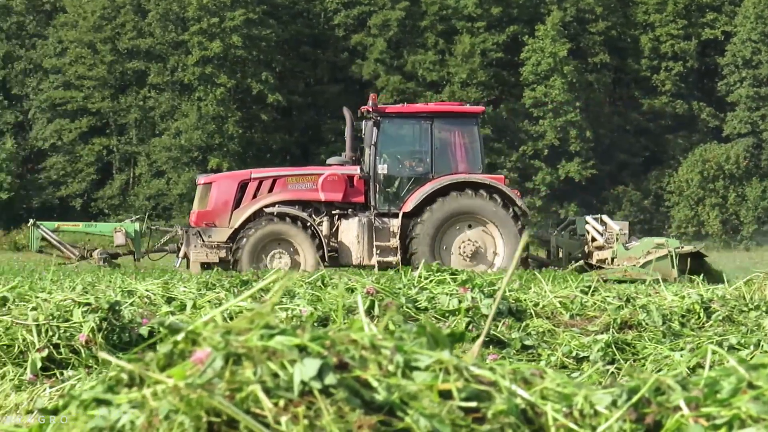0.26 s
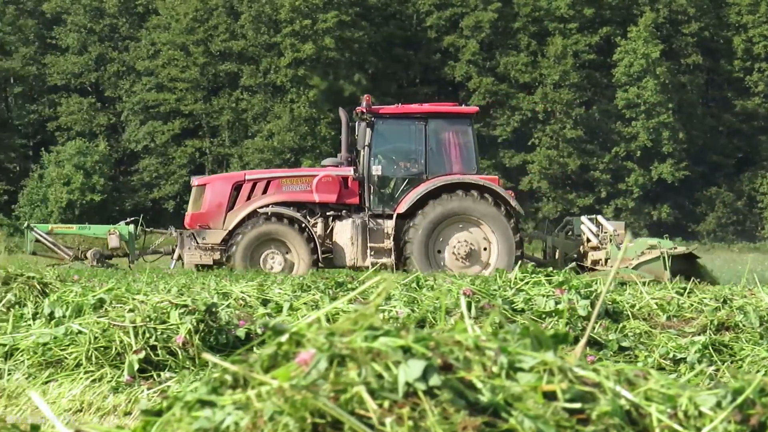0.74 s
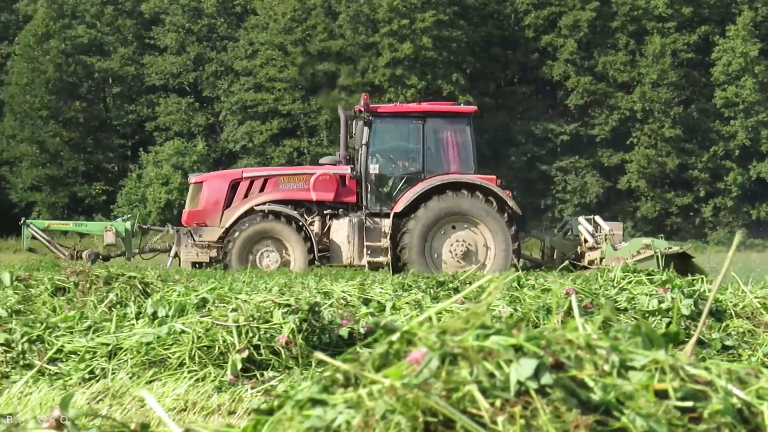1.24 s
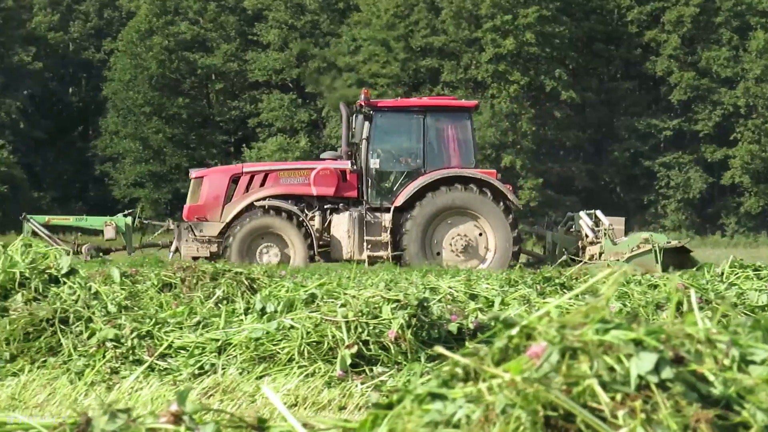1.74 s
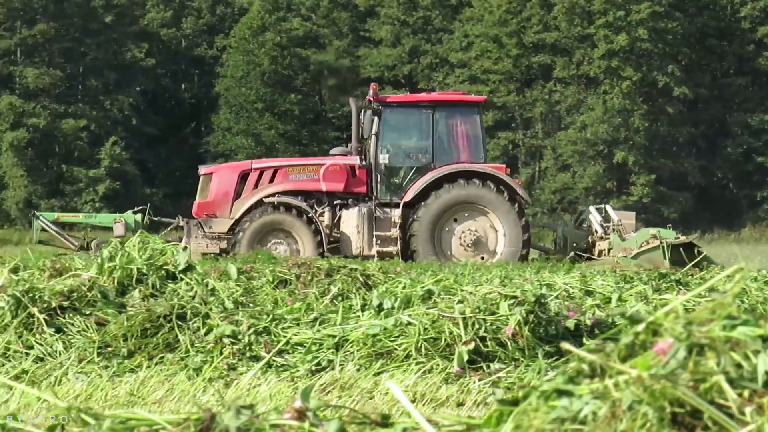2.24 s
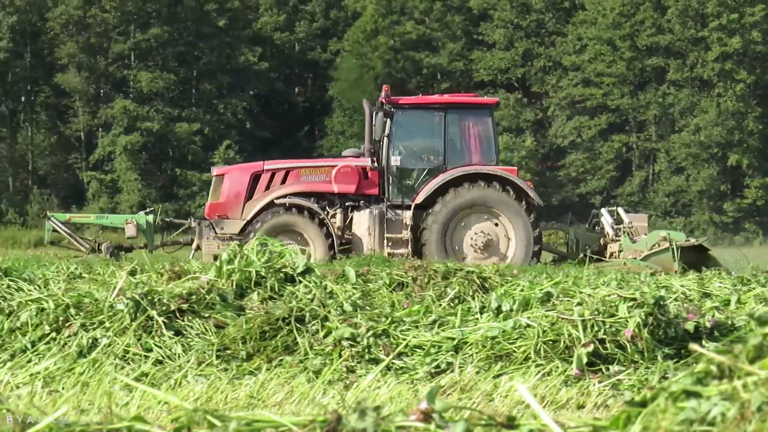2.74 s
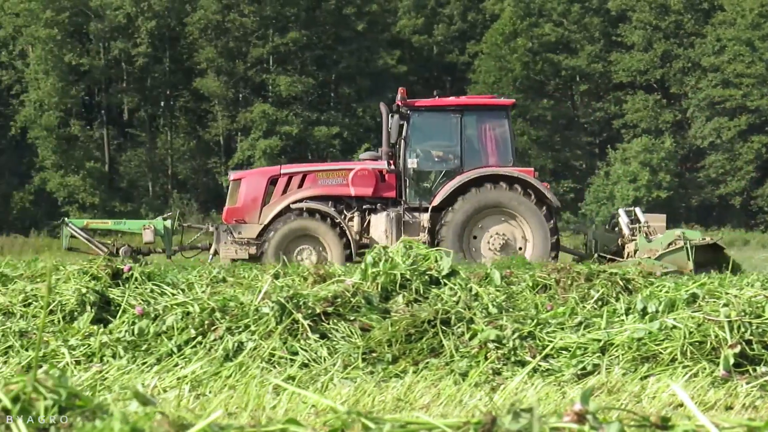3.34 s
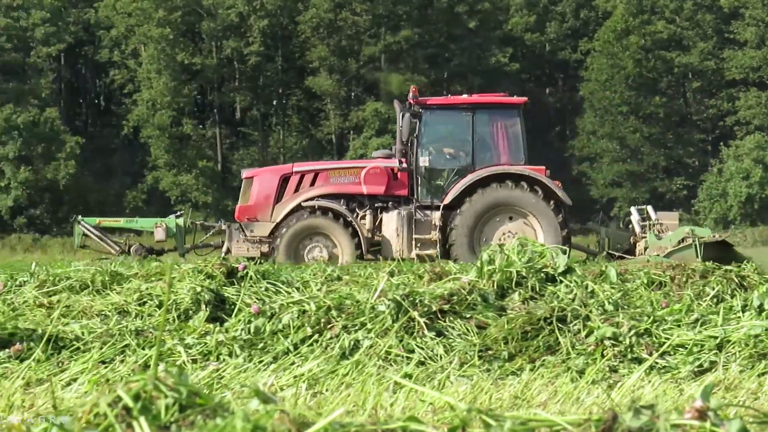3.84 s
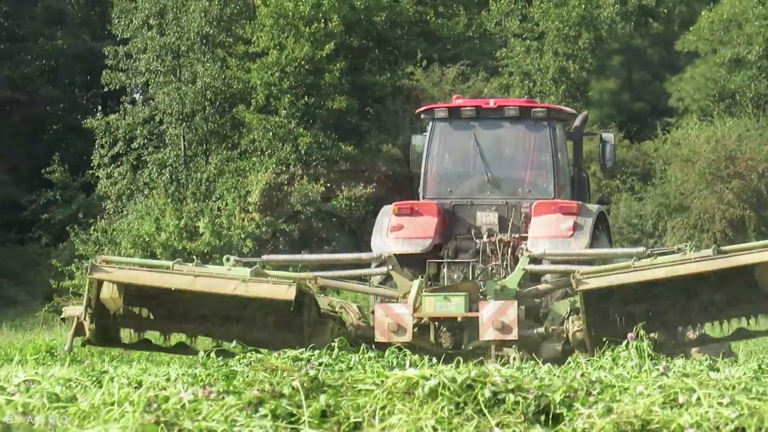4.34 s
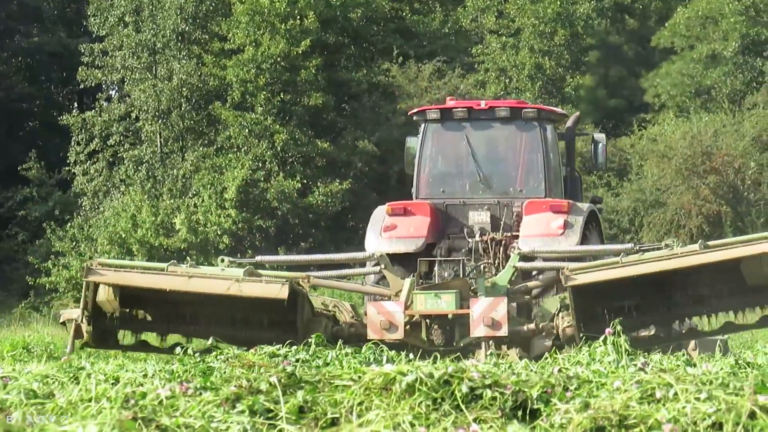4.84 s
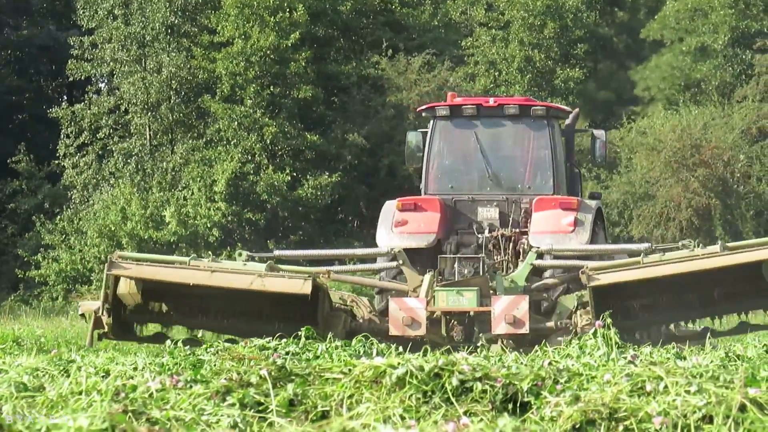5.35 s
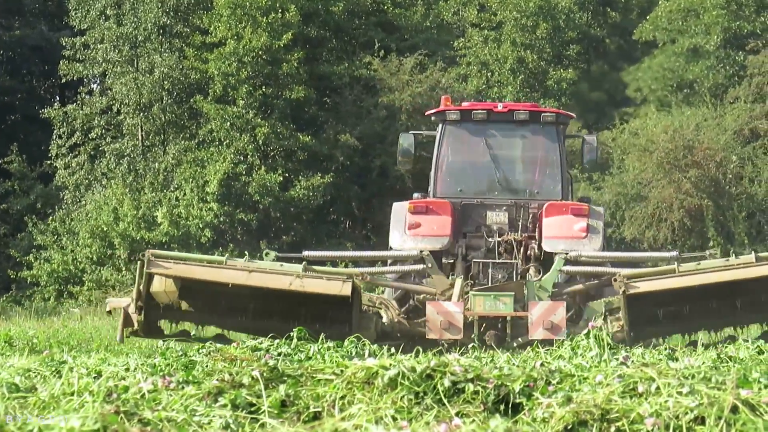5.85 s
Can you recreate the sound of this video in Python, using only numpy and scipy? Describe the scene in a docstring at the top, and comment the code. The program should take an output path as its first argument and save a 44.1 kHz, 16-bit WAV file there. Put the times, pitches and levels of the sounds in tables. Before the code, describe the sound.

Outdoors in a meadow, a heavy six-cylinder diesel tractor with front and rear disc mowers works at high, nearly constant revs from 0 to 4.3 seconds. A strong low firing drone near 97 Hz beats quickly with the rear mower hum and slowly with the front one. Beneath are exhaust rumble, dull diesel knock, rattling metal and soft grass swish. Gear whine swells around 1.5, 2.9 and 4 seconds; a very faint, thin turbo whistle fades by 0.9 and returns near 3.7-4.2. Revs sag slightly from 3.2, and swish thickens near 3.9. At 4.28 a hard cut with a tiny click drops the firing note to about 74 Hz. From behind, a rear mower hum near 155 Hz leads, knives chop the hiss, and knock and swish slowly recede until the abrupt end at about 6.1. Sound is central, almost mono, with little high treble.

```python
"""A six-cylinder tractor drives disc mowers across a meadow, heard first from the side, then,
after a hard cut, from behind at lower revs. One crank speed per view drives exhaust tones, the hum of
front and rear mowers beating against the firing tone, and diesel knock; from the side also gear whine.
Under them lie shaped noises: exhaust rumble, rattling machinery and the swish of knives in the grass.
Two thin turbocharger whistles, gliding sines, sound in the side view."""
import sys
import numpy as np
from scipy import signal
from scipy.fft import rfft, irfft
from scipy.io import wavfile

SR = 44100
rng = np.random.default_rng(int(sys.argv[2]) if len(sys.argv) > 2 else 0)


def dump(signal):
    """Clip the signal to [-1, 1] and save it as 16-bit WAV at the path in sys.argv[1]."""
    limited = np.clip(np.atleast_2d(signal).T, -1, 1)
    pcm = np.round(limited * 32767).astype(np.int16)
    wavfile.write(sys.argv[1], SR, pcm)


N = 268569
TIME, FREQS = np.arange(N) / SR, np.fft.rfftfreq(N, 1 / SR)


def amp(db):
    """Decibels to gain."""
    return 10 ** (np.asarray(db) / 20)


def unit(x):
    """Scales to rms 1."""
    return x / np.sqrt(np.mean(x ** 2) + 1e-20)


def follow(rows):
    """One curve over time for each column after start_s, linear between rows."""
    start_s, *columns = np.transpose(rows)
    return [np.interp(TIME, start_s, column) for column in columns]


def spectrum(points):
    """Gain at every frequency from (freq_hz, level_db) points, on a log frequency axis."""
    freq_hz, level_db = np.transpose(points)
    return amp(np.interp(np.log(FREQS + 1), np.log(freq_hz + 1), level_db))


def shaped(x, gain):
    """Filters x by a gain for every frequency."""
    return irfft(rfft(x) * gain, N)


def wander(rate_hz):
    """Slow random drift of rms 1: noise under a Gaussian low-pass."""
    lowpass = np.exp(-.5 * (FREQS / rate_hz) ** 2)
    return unit(shaped(rng.standard_normal(N), lowpass))


def tone(turns, level_db):
    """A sine of the given rms level, one period per turn."""
    return np.sqrt(2) * amp(level_db) * np.cos(2 * np.pi * turns)


REAR_MOWER_RATIO, FRONT_MOWER_RATIO = 1.584, 1.479  # disc turns per crank turn


def shaft_turns(speed, throb_s):
    """Turns of the crank and of the rear and front mower discs, which are geared to it."""
    turns = np.cumsum(follow(speed)[0]) / SR
    rear_at, front_at = np.interp(throb_s, TIME, turns)
    rear = REAR_MOWER_RATIO * (turns - rear_at)
    # 3 firings against 2 knives: the offset puts the front hum in phase with the firing tone at front_at
    front = FRONT_MOWER_RATIO * (turns - front_at) + 3 / 2 * (front_at - rear_at)
    return turns - rear_at, rear, front


def drone(turns, levels_db, waver_db):
    """The firing tone and its octave: six cylinders fire three times a crank turn."""
    firings = 3 * turns
    return sum(tone(k * firings, db + waver_db * wander(3.7)) for k, db in enumerate(levels_db, start=1))


def shaft_tones(turns, orders, waver_db, jitter_turns, any_angle):
    """Tones locked to a shaft; uneven load makes each waver in level and shakes the shaft a little."""
    turns = turns + jitter_turns * wander(4.1)
    total = 0
    for order, level_db in orders:
        angle = any_angle * rng.random()
        total = total + tone(order * turns + angle, level_db + waver_db * wander(6.0))
    return total


# strength of each cylinder's knock, in firing order: level_db
CYLINDERS_DB = [-3, -23, -12.5, -6, -13.5, -14.5]


def knock_pulses(turns, depth, decay):
    """Each firing is a burst decaying over its share of the cycle; decay is in firing intervals."""
    firings = 3 * turns
    cylinder = np.floor(firings).astype(int) % len(CYLINDERS_DB)
    strength = amp(CYLINDERS_DB)[cylinder]
    return 1 + depth * strength * np.exp(-(firings % 1) / decay)


def cycle_noise(turns, repeat):
    """Noise of which a power share, repeat, recurs with every engine cycle of two turns."""
    samples_per_cycle = int(2 * N / (turns[-1] - turns[0]))
    cycle = rng.standard_normal(samples_per_cycle)
    position = (turns / 2 % 1 * samples_per_cycle).astype(int) % samples_per_cycle
    repeat = np.clip(repeat, 0, 1)
    return np.sqrt(repeat) * cycle[position] + np.sqrt(1 - repeat) * rng.standard_normal(N)


# slow chance swell on bumpy ground: rumble_db, knock_db, rattle_db, swish_db (rms)
UNEVEN_DB = (1.0, 0.82, 0.54, 0.33)
UNEVEN_HZ = 4.4


def machine_noise(turns, levels_db, colour, notches, knock, rattle, swish, repeat, flutter_db):
    """Exhaust rumble, diesel knock, rattling metal and knives in grass, each in its own register."""
    notch_db = sum(db * np.exp(-.5 * ((FREQS - hz) / width) ** 2) for hz, width, db in notches)
    gain = spectrum(colour) * amp(notch_db)

    disc_turns = REAR_MOWER_RATIO * turns
    knives = np.cos(2 * np.pi * disc_turns) + np.cos(4 * np.pi * disc_turns)
    drives = [
        rng.standard_normal(N),
        cycle_noise(turns, repeat) * knock_pulses(turns, knock, decay=0.6),
        cycle_noise(turns, repeat / 2) * knock_pulses(turns, rattle, decay=0.29) * amp(flutter_db * wander(25)),
        rng.standard_normal(N) * (1 + swish * knives) * amp(flutter_db * wander(25))]

    # power crossovers between the four registers
    below = [1 / (1 + (FREQS / hz) ** 24) for hz in (480, 1400, 3100)]
    edges = [0 * FREQS, *below, np.ones(len(FREQS))]
    registers = np.sqrt(np.abs(np.diff(edges, axis=0)))

    total = 0
    for drive, register, level_db, uneven_db in zip(drives, registers, levels_db, UNEVEN_DB):
        layer = unit(shaped(drive, gain * register))
        total = total + amp(level_db + uneven_db * wander(UNEVEN_HZ)) * layer
    return total


# whine at twice the tooth rate: start_s, level_db
WHINE = [(0, -51), (.65, -55), (1.1, -44.5), (1.55, -39), (2.0, -50), (2.9, -38.5), (3.25, -51),
         (3.55, -43.5), (3.97, -40), (4.28, -58)]
# whine at three times the tooth rate: start_s, level_db
WHINE_OVERTONE = [(0, -44.5), (.75, -58), (2.2, -44.5), (3.1, -49.5), (4.28, -55)]
GEAR_TEETH, WHINE_WAVER_DB = 29, 1.8


def gear_whine(turns):
    """Overtones of a meshing crank gear, slightly blurred by play between the teeth."""
    mesh = GEAR_TEETH * turns + .012 * wander(14)
    levels_db = follow(WHINE) + follow(WHINE_OVERTONE)
    return sum(tone(k * mesh, db + WHINE_WAVER_DB * wander(2.5)) for k, db in enumerate(levels_db, start=2))


def turbo(start_s, length_s, pitch_hz, glide_hz_per_s, peak_db):
    """A thin turbocharger whistle of unsteady pitch that swells and fades over a half sine."""
    since_s = TIME - start_s
    pitch = pitch_hz + glide_hz_per_s * since_s + 7 * wander(30)
    swell = np.sin(np.pi * np.clip(since_s / length_s, 0, 1))
    return swell * tone(np.cumsum(pitch) / SR, peak_db)


# crank speed, sagging under load: start_s, crank_turns_per_s
SIDE_SPEED = [(0, 32.17), (.65, 32.07), (1.4, 32.33), (2.2, 32.24), (3.15, 32.11), (3.8, 31.48),
              (4.28, 31.3)]
# weaker exhaust tones, halves from unequal cylinders: crank_order, level_db
SIDE_EXHAUST = [(2, -55), (2.5, -42), (3.5, -33.5), (4, -29), (4.5, -38), (5, -32.5), (5.5, -48),
                (7, -41.5), (9, -46), (12, -47), (21, -56), (25, -52.5), (28, -60.5), (31, -50)]
# rear mower hum, two knives a disc: disc_order, level_db
SIDE_DISCS = [(1, -33.5), (2, -26), (3, -28), (4, -38), (6, -41), (8, -58)]
# front mower hum: disc_order, level_db
SIDE_FRONT_DISCS = [(1, -53), (2, -30.5), (3, -40), (4, -29.5), (6, -52)]
# thickness of the grass at the knives: start_s, swish_db
SIDE_CROP = [(0, 3), (.85, -1.5), (1.85, 1.2), (2.3, -2.5), (2.8, 0.3), (3.7, 0.4), (3.92, 4.5),
             (4.12, 1.6)]
# share of the crop's swell: rumble, knock, rattle, swish (ratios)
CROP_SHARE = (.05, .15, .55, 1.0)
# noise colour, relative within each register: freq_hz, level_db
SIDE_COLOUR = [(20, -67.5), (40, -59.5), (70, -52), (130, -50), (200, -46), (280, -60), (360, -73),
               (700, -63), (1800, -59), (3000, -65), (5000, -79.5), (7000, -89), (9500, -101.6),
               (15500, -117.8)]
# direct sound cancelled by reflections from ground and bodywork, plus a narrow dip near 1.9 kHz: freq_hz,
# width_hz, gain_db
SIDE_NOTCHES = [(602, 103, -8), (1165, 59, -12), (1456, 123, -8.5), (1940, 31, -11.5), (2296, 94, -5.5),
                (3125, 103, -12), (3473, 117, -8.5), (3833, 103, -9.5), (4520, 65, -14.5), (5260, 76, -10),
                (6250, 76, -7), (6970, 80, -9.5), (7830, 120, -6), (8640, 200, -5)]
# turbocharger whistles: start_s, length_s, pitch_hz (at start), glide_hz_per_s, peak_db
TURBO = [(-.2, 1.1, 10630, 20, -73.5), (3.7, .5, 10080, -420, -72.5)]
SIDE_THROB_S = (2.01, 1.965)  # rear, front mower hum in phase with the firing tone
SIDE_DRONE_DB = (-21.5, -31)  # firing tone, octave
SIDE_NOISE_DB = (-22, -40.5, -36, -41.5)  # rumble, knock, rattle, swish before the crop's swell


def from_side():
    """High revs: the firing tone beats quickly against the rear mower and slowly against the front one."""
    turns, rear, front = shaft_turns(SIDE_SPEED, SIDE_THROB_S)
    firing = drone(turns, SIDE_DRONE_DB, waver_db=1.8)
    exhaust = shaft_tones(turns, SIDE_EXHAUST, waver_db=1.5, jitter_turns=0.0034, any_angle=True)
    rear_hum = shaft_tones(rear, SIDE_DISCS, waver_db=-0.5, jitter_turns=0.0057, any_angle=False)
    front_hum = shaft_tones(front, SIDE_FRONT_DISCS, waver_db=3.3, jitter_turns=0.0019, any_angle=False)
    crop_db = follow(SIDE_CROP)[0]
    levels_db = [db + share * crop_db for db, share in zip(SIDE_NOISE_DB, CROP_SHARE)]
    noise = machine_noise(turns, levels_db, SIDE_COLOUR, SIDE_NOTCHES,
                          knock=2.6, rattle=.15, swish=.015, repeat=0.18, flutter_db=0.68)
    whistles = sum(turbo(*row) for row in TURBO)
    return firing + exhaust + rear_hum + front_hum + noise + gear_whine(turns) + whistles


# crank speed: start_s, crank_turns_per_s
REAR_SPEED = [(4.28, 24.52), (4.85, 24.54), (5.2, 24.72), (5.7, 24.52), (6.09, 23.98)]
# weaker exhaust tones: crank_order, level_db
REAR_EXHAUST = [(1.5, -47.5), (4, -52.5), (4.5, -37.5), (5.5, -49.5), (9, -46), (12, -50)]
# rear mower hum: disc_order, level_db
REAR_DISCS = [(2, -35), (4, -19.5), (5, -40.5), (6, -40), (8, -39.5), (10, -47), (16, -58.5)]
# front mower hum: disc_order, level_db
REAR_FRONT_DISCS = [(2, -44), (4, -32)]
# fade while driving away: rumble, knock, rattle, swish (dB per s)
RECEDE_DB_PER_S = (0.24, 1.1, .5, 1.25)
# rise with the revs: rumble, knock, rattle, swish (dB per crank turn a second)
REVS_DB = (2.9, 2.5, 5.4, 1.1)
# noise colour, relative within each register: freq_hz, level_db
REAR_COLOUR = [(20, -90.5), (40, -52), (70, -58), (130, -45.5), (200, -49.5), (280, -52), (360, -64.5),
               (700, -69), (1800, -66.5), (3000, -69.5), (5000, -77.5), (7000, -85.5), (9500, -100.9),
               (15500, -116.6)]
# reflections cancelling or reinforcing the direct sound: freq_hz, width_hz, gain_db
REAR_NOTCHES = [(571, 40.5, -13.5), (930, 110, -3.5), (1404, 130, -6.5), (1830, 170, -0.5), (2560, 300, -5),
                (3240, 63, 2), (3480, 60, -8), (4750, 88, -10), (5130, 65, 3.5), (5570, 150, -9.5),
                (6440, 90, -17.5), (7380, 190, -8.5), (8100, 97, -9)]
REAR_THROB_S = (5.01, 4.55)  # rear, front mower hum in phase with the firing tone
REAR_DRONE_DB = (-23, -34)  # firing tone, octave
REAR_NOISE_DB = (-24.5, -41.5, -38.5, -39.5)  # rumble, knock, rattle, swish at the cut
CUT_S = 4.2802


def from_behind():
    """Low revs, driving away: the rear mower's hum leads and the knives chop the hiss."""
    turns, rear, front = shaft_turns(REAR_SPEED, REAR_THROB_S)
    firing = drone(turns, REAR_DRONE_DB, waver_db=1.7)
    exhaust = shaft_tones(turns, REAR_EXHAUST, waver_db=-3.0, jitter_turns=0.0036, any_angle=True)
    rear_hum = shaft_tones(rear, REAR_DISCS, waver_db=.6, jitter_turns=.003, any_angle=False)
    front_hum = shaft_tones(front, REAR_FRONT_DISCS, waver_db=-0.3, jitter_turns=.003, any_angle=False)
    speed = follow(REAR_SPEED)[0]
    levels_db = [db - fade * (TIME - CUT_S) + revs_db * (speed - speed[0])
                 for db, fade, revs_db in zip(REAR_NOISE_DB, RECEDE_DB_PER_S, REVS_DB)]
    noise = machine_noise(turns, levels_db, REAR_COLOUR, REAR_NOTCHES,
                          knock=1.7, rattle=0.49, swish=0.13, repeat=0.17, flutter_db=.5)
    return firing + exhaust + rear_hum + front_hum + noise


def splice(first, second, click_db, click_s):
    """An abrupt edit from one view to the next, with a small decaying click at the joint."""
    since_s = TIME - CUT_S
    over = np.clip(since_s / click_s + .5, 0, 1)
    click = amp(click_db) * (since_s >= 0) * np.exp(-np.abs(since_s) / click_s)
    return (1 - over) * first + over * second - click


# sound scattered back from the sides: freq_hz, level_db (against the direct sound)
WIDTH = [(60, -38.5), (110, -31.5), (200, -25), (380, -12.5), (700, -14.5), (1290, -21.5), (2380, -21),
         (4400, -15), (8120, -7.5), (15000, -24)]


def scene():
    """The tractor straight ahead; faint scatter, added left and subtracted right, gives a little width."""
    direct = splice(from_side(), from_behind(), click_db=-11.0, click_s=0.0013)
    echo_samples = SR // 12
    echoes = rng.standard_normal(echo_samples) * np.linspace(1, 0, echo_samples)
    echo_phase = np.exp(1j * np.angle(rfft(echoes, N)))  # only the phase of the echoes is used
    side = shaped(direct, spectrum(WIDTH) * echo_phase)
    return np.array([direct + side, direct - side]) * amp([[-.1], [.1]])


EDGE_HZ = 15600


def record(dry):
    """Limits the band with a linear-phase low-pass, after 3 ms fades at both ends."""
    ends = np.clip(np.minimum(TIME, TIME[-1] - TIME) / .003, 0, 1)
    lowpass = signal.firwin(511, EDGE_HZ, window=("kaiser", 9), fs=SR)
    return signal.oaconvolve(dry * ends, lowpass[None], "same")


dry = scene()
out = record(dry)
dump(out)
```